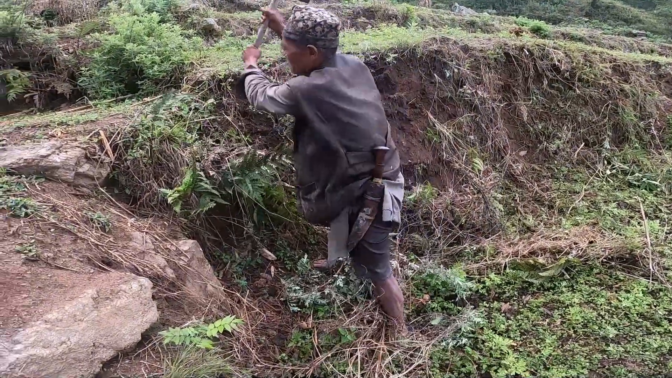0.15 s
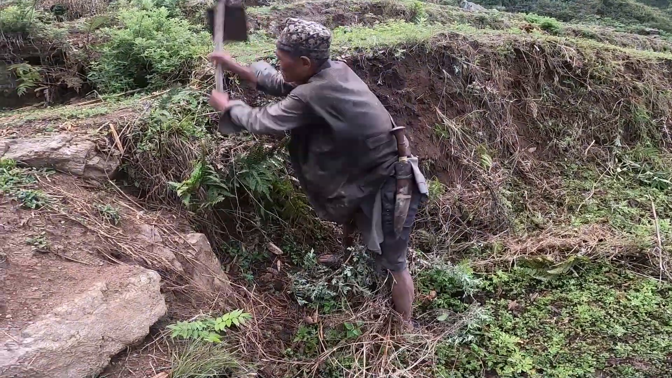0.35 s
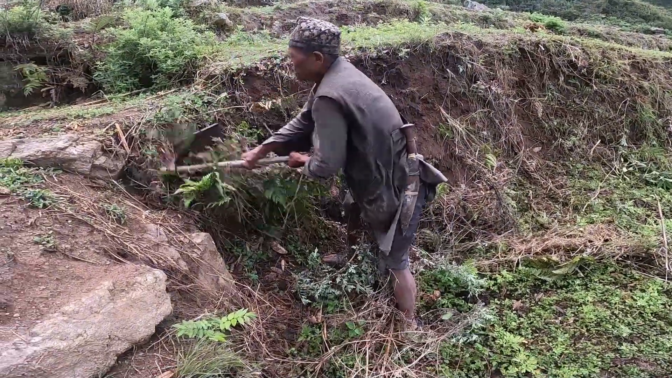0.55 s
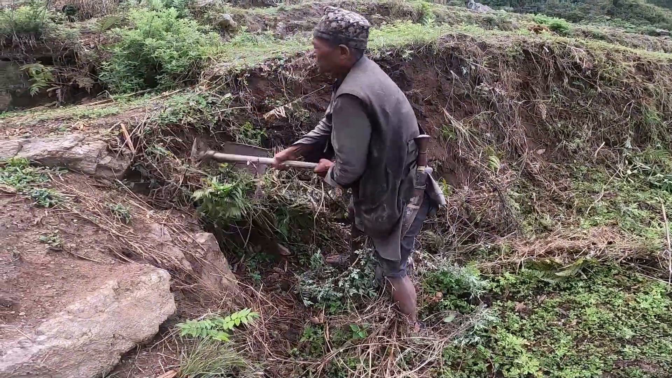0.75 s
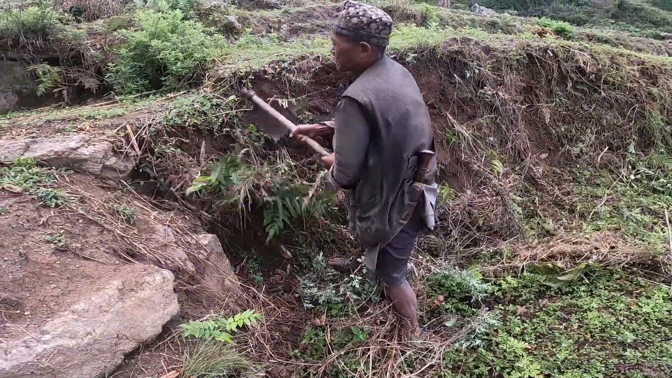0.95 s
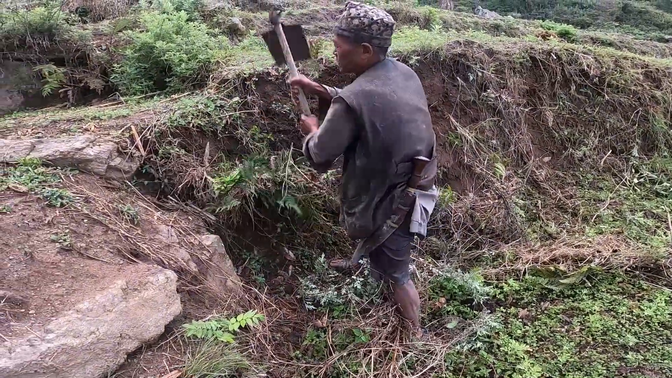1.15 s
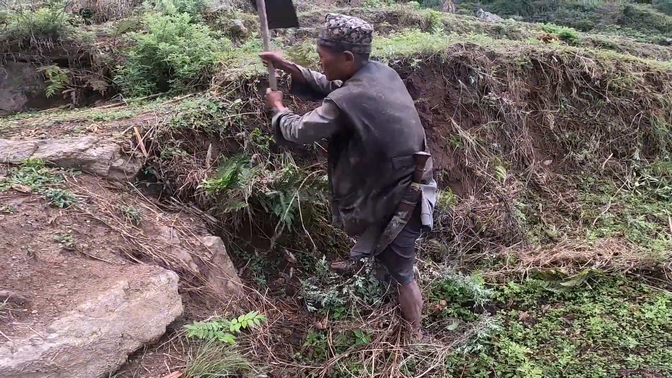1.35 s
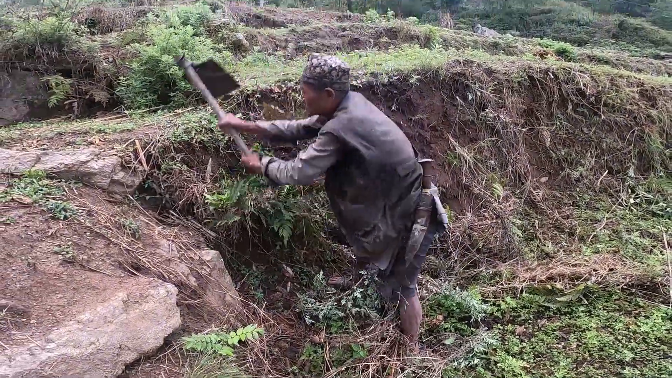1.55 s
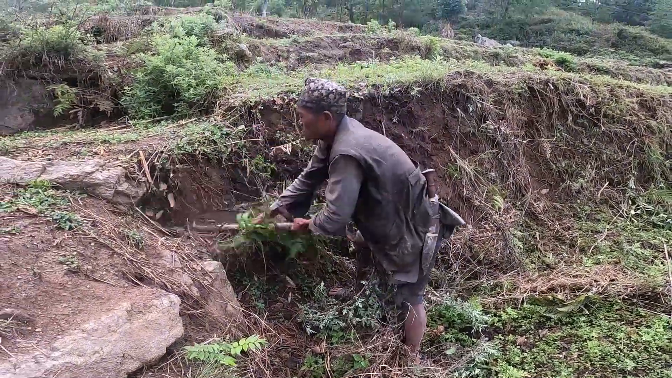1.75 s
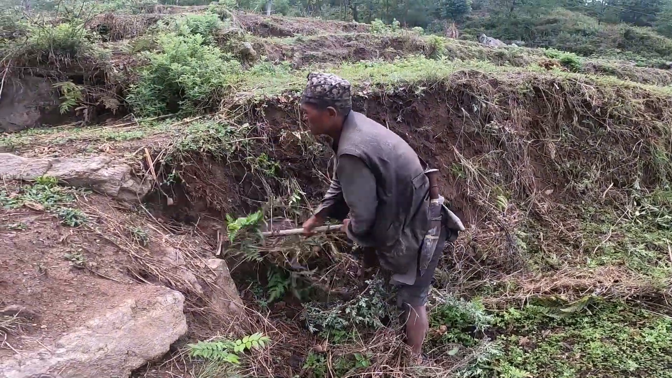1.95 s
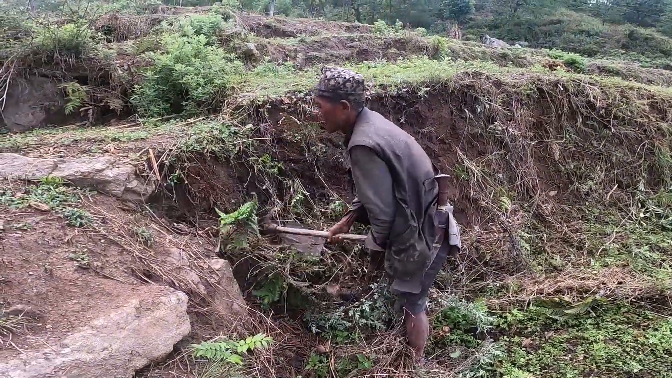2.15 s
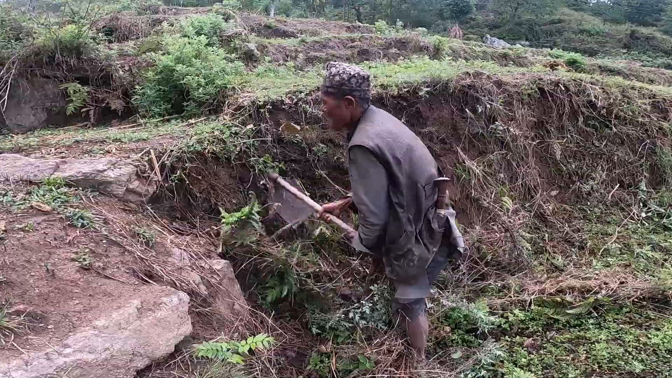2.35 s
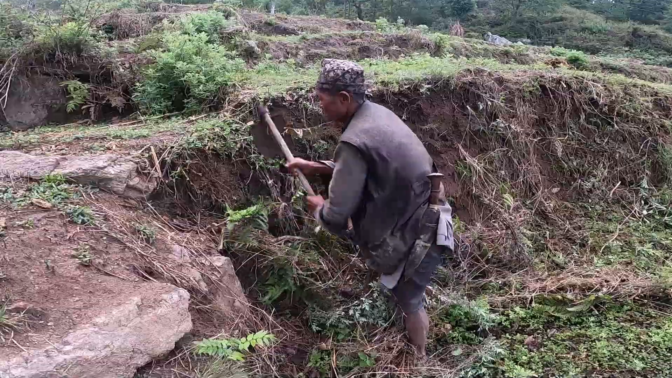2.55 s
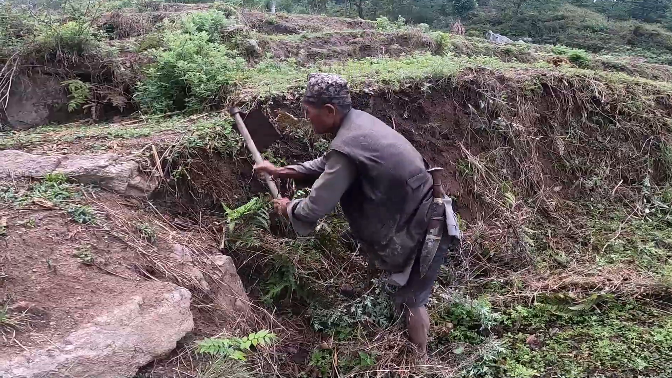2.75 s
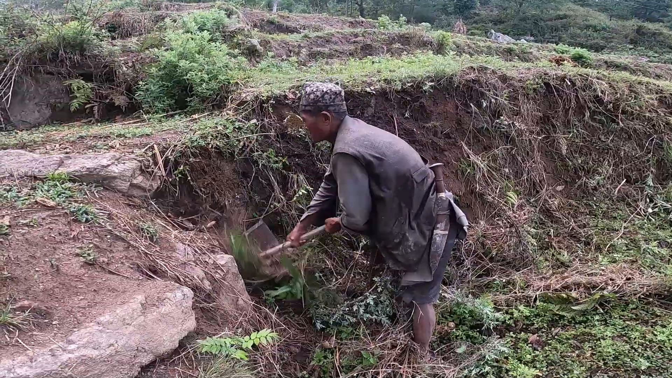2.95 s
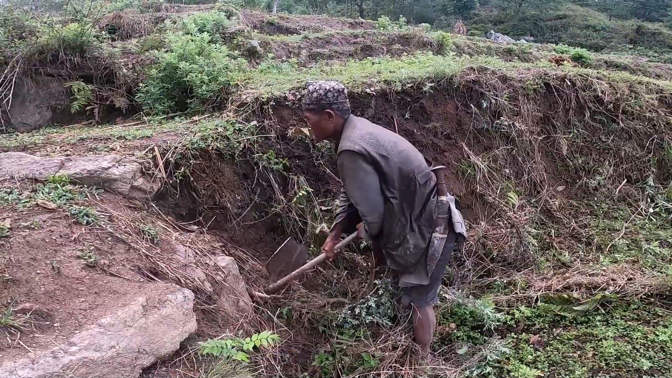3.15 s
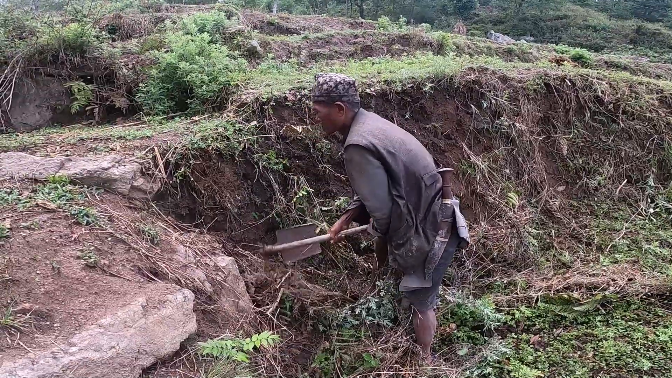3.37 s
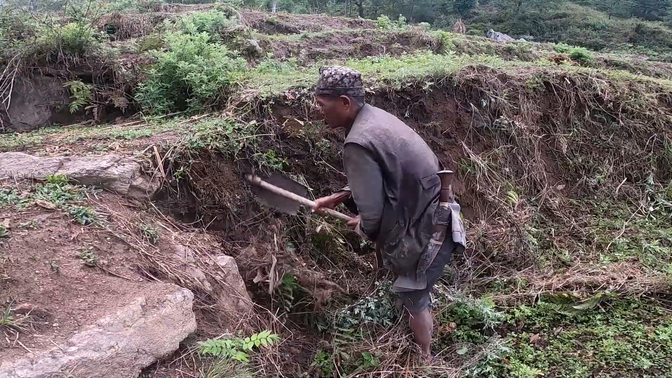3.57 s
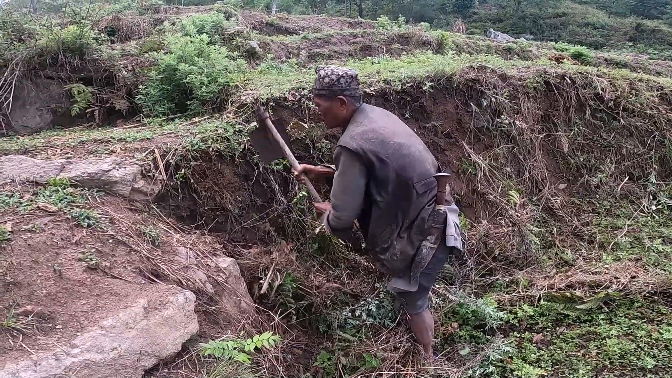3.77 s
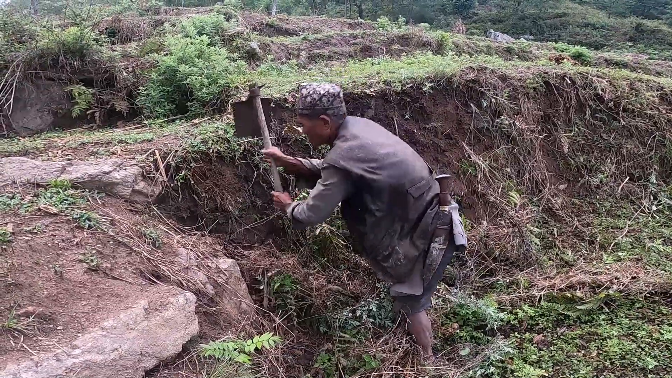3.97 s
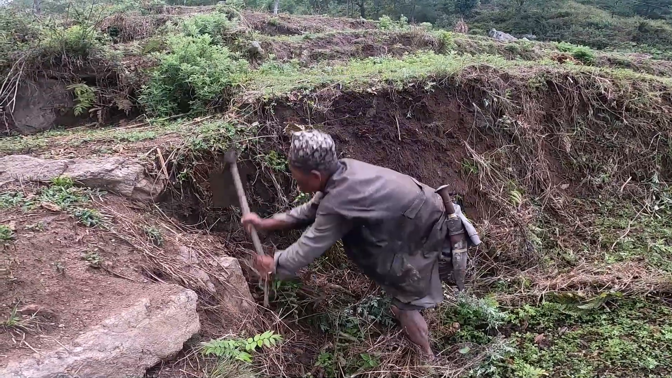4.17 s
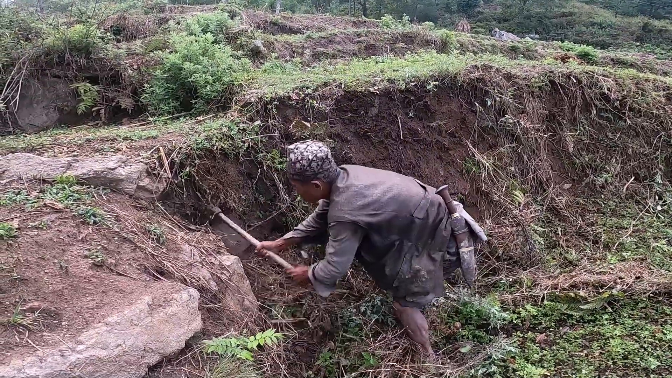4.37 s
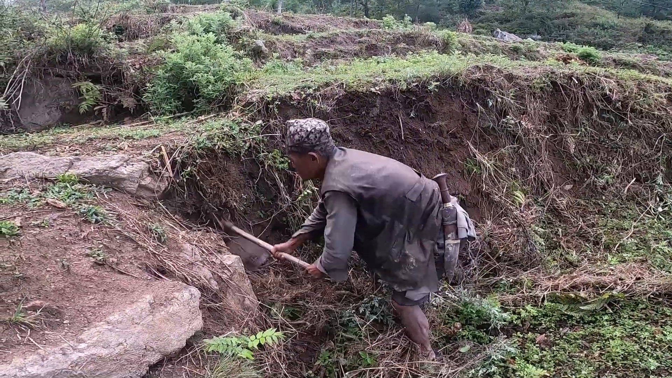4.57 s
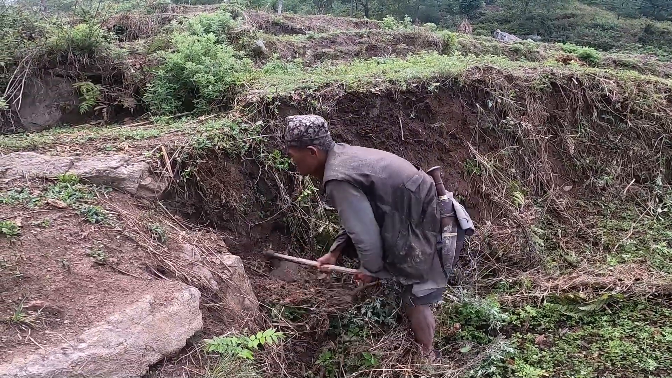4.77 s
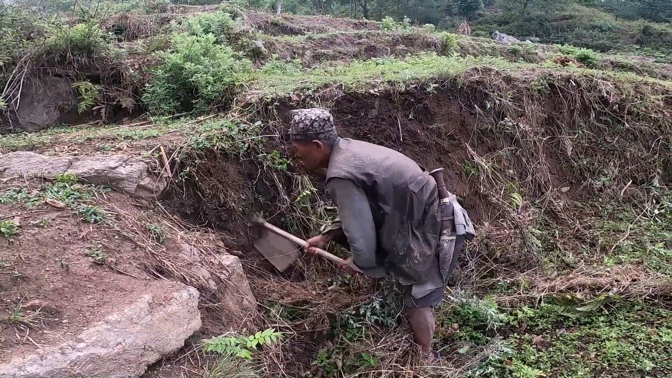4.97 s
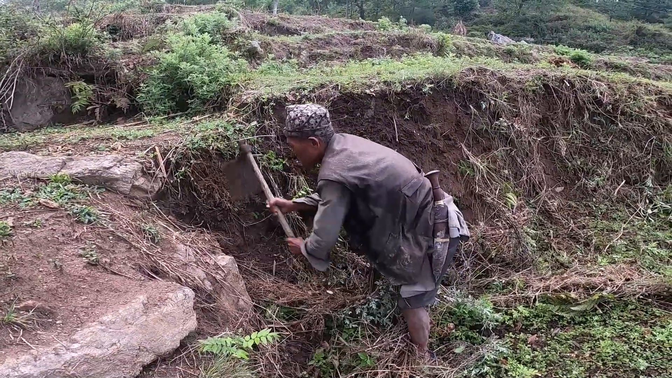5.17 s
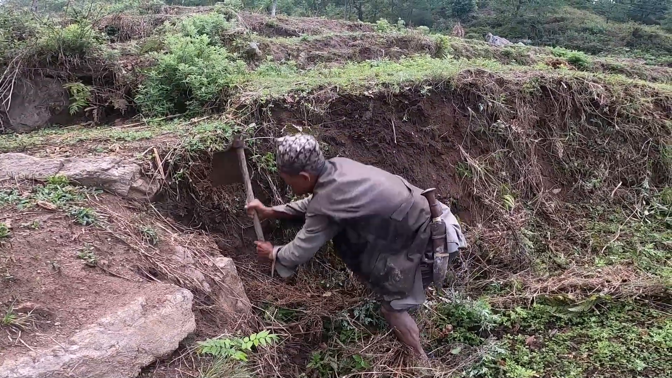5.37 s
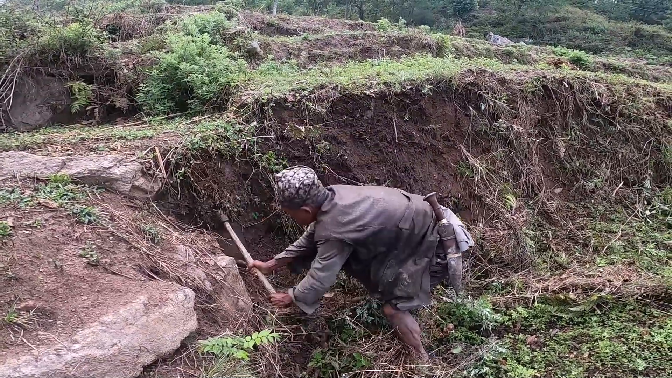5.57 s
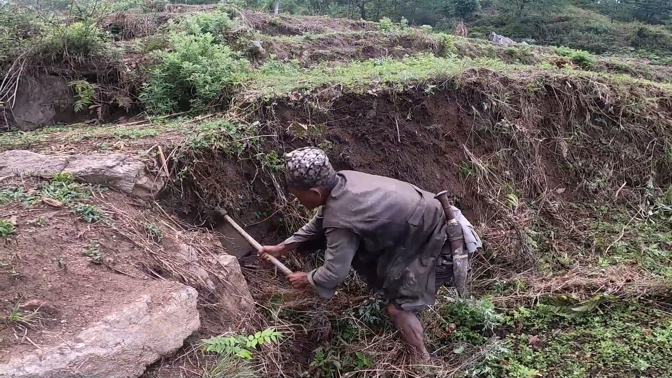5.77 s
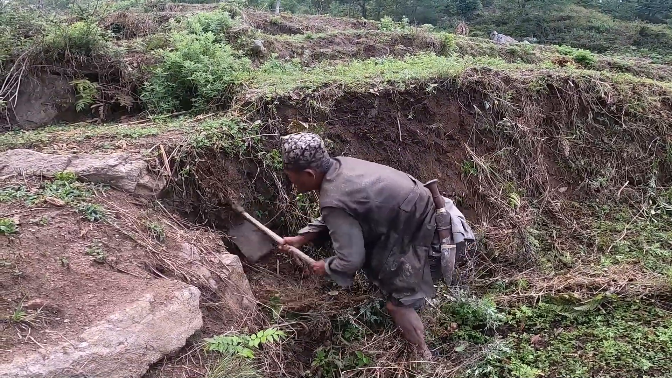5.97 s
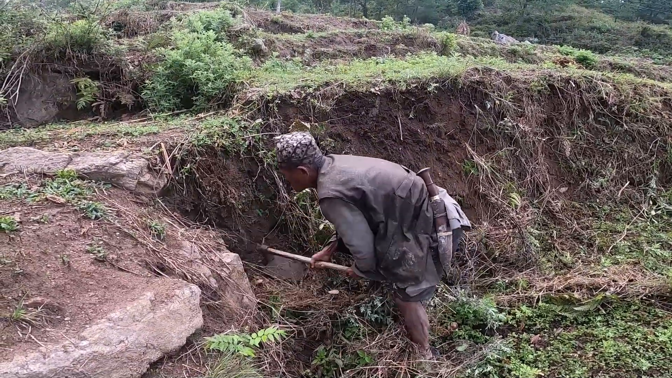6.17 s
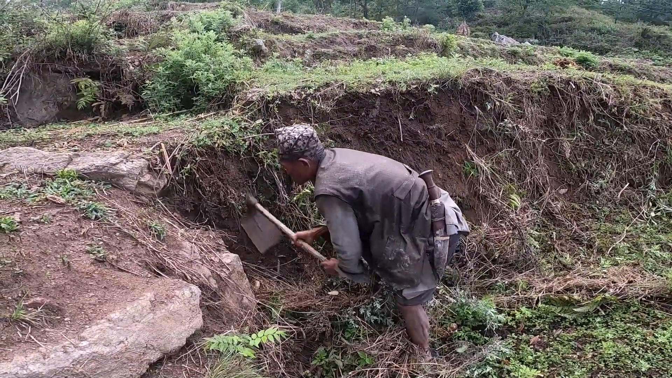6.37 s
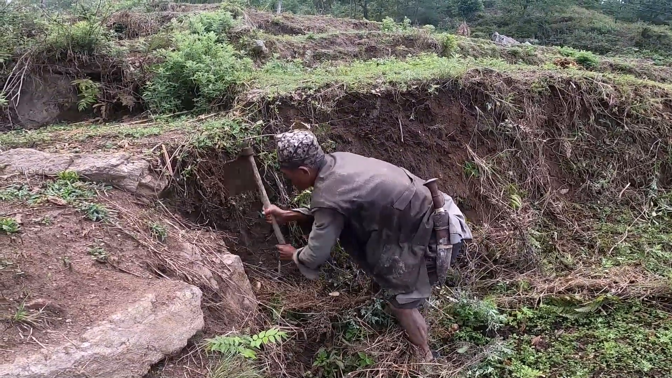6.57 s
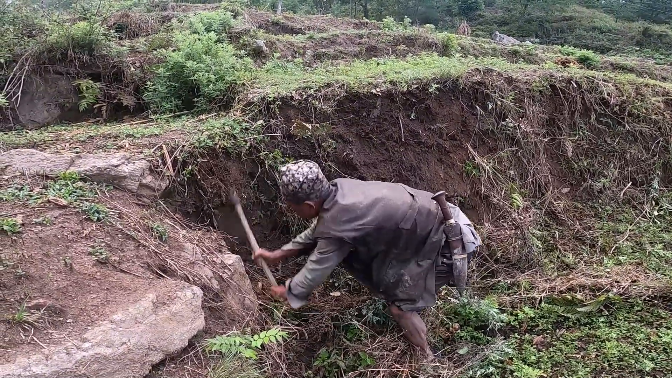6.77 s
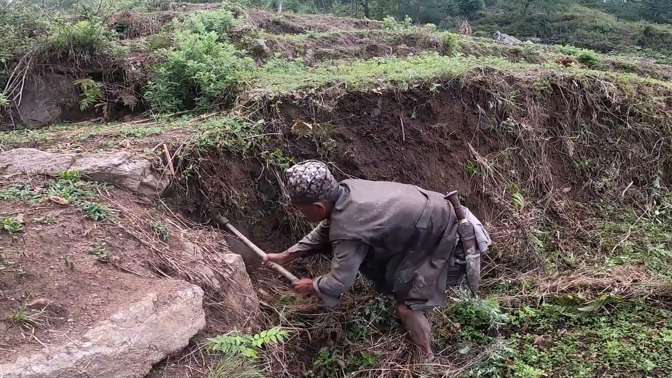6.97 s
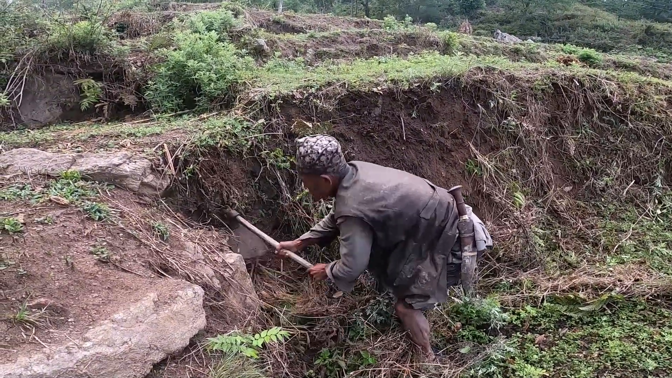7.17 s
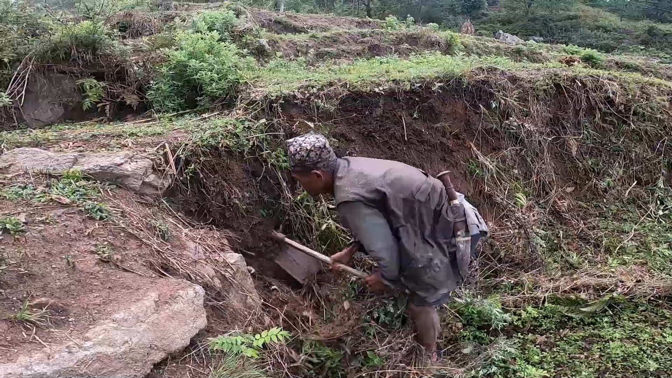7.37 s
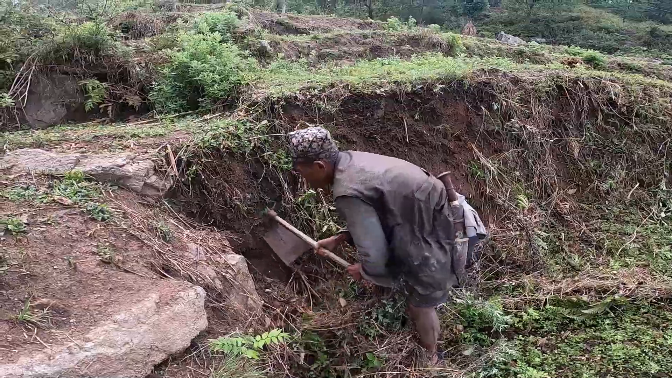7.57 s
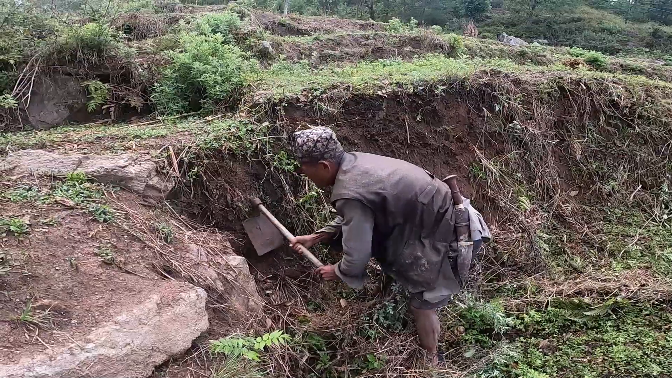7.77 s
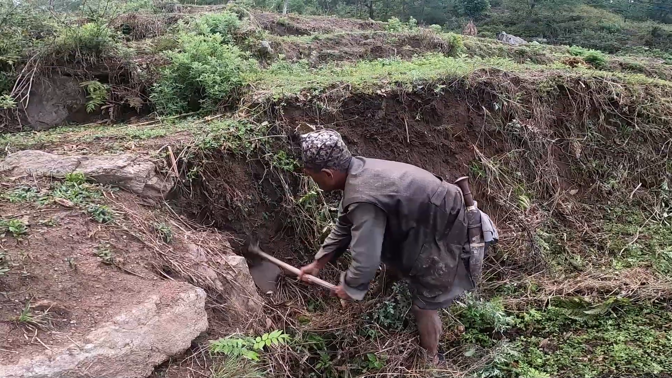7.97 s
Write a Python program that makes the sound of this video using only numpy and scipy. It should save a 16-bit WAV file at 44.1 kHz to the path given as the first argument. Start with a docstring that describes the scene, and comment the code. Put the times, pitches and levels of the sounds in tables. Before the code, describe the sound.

Loose soil trickles through dry grass, then a hand hoe chops into an earth bank close by, a little more than once a second. The strokes thud and tear through roots, and the steel blade sometimes scrapes grit or clinks on a stone. Clods drop and more soil spills down with a hiss and a patter. Faint birds whistle far off over the soft hush of an open hillside.

```python
"""Loose soil trickles through dry grass and a far bird whistles; then a hand hoe chops into an earth bank.
With each stroke the steel blade tears through roots; often it thumps the ground or clinks on a stone.
Clods drop, grit scrapes over the steel, and more soil spills down with a hiss and a patter.
Birds keep calling across the open hillside, over a soft hush of air."""
import sys
import numpy as np
from scipy import signal
from scipy.fft import rfft, irfft, next_fast_len
from scipy.io import wavfile

SR = 44100
rng = np.random.default_rng(int(sys.argv[2]) if len(sys.argv) > 2 else 0)


def wav_record(signal):
    """Record a signal, one row per channel, as 16-bit PCM in the file named by sys.argv[1]."""
    frames = np.transpose(np.atleast_2d(signal))
    bounded = np.clip(frames, -1, 1)
    # unit amplitude maps onto the largest positive 16-bit level
    quanta = np.round(bounded * 32767).astype(np.int16)
    wavfile.write(sys.argv[1], SR, quanta)


N = 353814
TIME = np.arange(N) / SR
AGE = TIME[:SR // 3]  # seconds since one short sound began

# how wide the sound is, side compared with middle: f/Hz, level/dB
STEREO_WIDTH = [(100, -19), (500, -15), (1200, -16), (2200, -10.5), (4500, -8.5), (8000, -7),
                (12500, -11.5)]
# how far the sound leans, left compared with right: f/Hz, level/dB
STEREO_LEAN = [(100, -0.7), (1200, 0), (2200, 2), (4500, 1.5), (8000, -2), (12500, -4)]
# tone of the air, rustling grass, soft crumbs, rumbling earth and tearing roots: f/Hz, relative level/dB
AIR_TONE = [(15, -47), (25, -2), (97, -13.5), (166, 4.5), (607, -4.5), (1070, 0), (1610, -1), (3340, -10.5),
            (4250, 4.5), (6920, -36.5), (8830, -25), (12200, -66), (16000, -50)]
RUSTLE_TONE = [(200, -28), (700, -10), (1300, 0.5), (2000, 1.5), (3200, 3), (4400, 2), (5600, -3),
               (8600, -5), (10300, -11.5), (12500, -13.5), (16000, -32.5)]
CRUMB_TONE = [(25, -23), (90, -17.5), (170, 7), (280, 5.5), (420, -2), (700, 2.5), (1200, 3), (2500, -19.5)]
EARTH_TONE = [(20, -27), (50, 5), (130, -3), (260, 1), (420, -13), (900, -26), (3000, -57)]
TEARING_TONE = [(60, -1), (200, 3), (420, 0), (700, 3), (1400, 2.5), (3000, 2), (5000, -3), (8500, -8.5),
                (10500, -16), (13000, -19), (16000, -39)]
# a bird's runs of three pips: t/s, relative level/dB
PIP_RUNS = [(2.763, -55), (3.448, -49), (4.151, -50), (4.828, -47), (5.507, -47), (6.214, -47),
            (6.91, -46.5), (7.629, -46.5)]
# pitches the first pip slides through: f/Hz
PIP_GLIDE = [1300, 1203, 990, 880]
# another bird's two-note calls: t/s, relative level/dB
WHISTLE_CALLS = [(0.021, -54), (0.899, -54), (3.96, -52.5), (4.97, -55), (7.581, -55.5)]
# spills of soil: start t/s, build-up/s, fade/(dB per s), rustle level/dB, crumb level/dB
SPILLS = [(-.2, 0.033, 23.5, -46, -60.5), (.58, .18, 23.5, -38, -54.5), (1.8, 0.069, 30.5, -38.5, -51),
          (3.02, 0.13, 84, -37.5, -52), (3.33, 0.21, 18.5, -47, -57.5), (4.271, 0.05, 23, -46, -54.5),
          (4.65, 0.12, 63, -40, -51.5), (5.52, 0.1, 24, -54.5, -70), (5.9, 0.28, 89, -46.5, -56),
          (6.83, 0.28, 25, -52, -58), (7.25, 0.15, 60, -38.5, -53)]
# dull, crumbly thumps of earth, as the hoe strikes or loose soil lands: t/s, level/dB, rise/s, fall/s
EARTH_THUMPS = [(1.772, -33, 0.0022, 0.0089), (1.839, -24.5, 0.005, 0.018), (2.403, -50, 0.006, 0.011),
                (3.053, -35, .005, 0.043), (3.573, -46.5, 0.0056, 0.098), (4.599, -46.5, 0.015, 0.016),
                (4.839, -47, 0.015, 0.015), (5.646, -28.5, 0.0037, 0.0096), (6.007, -40.5, 0.0064, 0.035),
                (6.955, -40, 0.0066, 0.0085), (7.288, -37, 0.0061, 0.037)]
# clods and pebbles landing, twigs snapping: t/s, relative level/dB, centre f/Hz
CLODS = [(0.435, -37.5, 3900), (0.647, -22, 1200), (.839, -23, 2400), (1.078, -29.5, 1160),
         (2.086, -23, 6100), (2.544, -39, 1490), (3.014, -23.5, 4500), (4.186, -33, 1530),
         (4.536, -33, 3000), (4.566, -24, 2600), (4.836, -23, 1060), (5.884, -31, 3120),
         (5.955, -29.5, 1400), (5.977, -32, 3500), (6.005, -24, 1300), (6.02, -29, 4480),
         (6.039, -46, 3220), (6.302, -35, 9000), (6.621, -43.5, 4000), (7.105, -35, 3970),
         (7.172, -30, 1800), (7.254, -27, 1300), (7.281, -24, 2200), (7.324, -22, 1300)]
# ringing tones of the steel blade, its twisting one first: f/Hz, relative level/dB, time to fade 60 dB/s
BLADE_TONES = [(1070, -6, 0.91), (1510, -3, 0.69), (1668, -21.5, 0.46), (1896, -11, 0.15),
               (2080, -27, 0.19), (2820, -12, 0.97), (3140, -47, 0.28), (3125, -11.5, 0.4),
               (3200, -13.5, 0.36), (4460, -9.5, 0.24), (7380, -18, 0.058), (8680, -16.5, .1)]
# short-lived tones of the wooden handle and its socket: f/Hz, relative level/dB, time to fade 60 dB/s
HANDLE_TONES = [(243, -3, 0.088), (595, 1.5, 0.042), (741, -2.5, 0.059), (1050, -14.5, 0.06),
                (1257, -1, 0.064), (1646, -4, 0.084), (1910, -4, 0.025), (2076, -15, 0.054),
                (2600, -7, 0.066), (3295, -7.5, 0.059), (4050, -17, 0.034), (4480, -20, 0.057),
                (6900, -22, 0.044)]
# grit dragging over the blade: peak t/s, level/dB, rise/s, fall/s
SCRAPES = [(0.599, -35, .01, .04), (1.807, -31.5, 0.0065, 0.017), (4.595, -40.5, 0.016, 0.052),
           (4.85, -45, 0.056, 0.11), (5.604, -46.5, 0.0074, 0.036), (6.028, -39, 0.021, 0.029),
           (6.876, -49.5, 0.022, 0.063), (7.308, -47, 0.033, .08)]
# blows on stones and hard earth (a corner blow twists the blade), with relative levels:
# t/s, centre f/Hz, crack/dB, clack/dB, ring/dB, extra twist/dB, longest ring the soil's grip allows/s
KNOCKS = [(1.7706, 1720, -23.5, -20, -21, -10, 0.45), (1.830, 960, -20, -17, -31, 0, 0.18),
          (1.943, 700, -42, -24, -23.5, -7.5, 0.59), (2.3931, 1600, -23.5, -31.5, -50, 7, 10),
          (3.048, 780, -21, -20, -23.5, 3, 0.15), (4.3634, 1370, -18.5, -26, -42, 2, 0.22),
          (5.593, 2400, -34.5, -40, -58, 3, 0.56), (5.644, 616, -20, -23.5, -36, 2, 0.076),
          (6.0525, 1300, -26.5, -21, -19, -9, 0.97), (6.2395, 3200, -23.5, -15, -26, -4.5, 1.2),
          (6.858, 2190, -47, -38, -63, -9, .51), (7.206, 1700, -28.5, -31, -39.5, -8, 0.44),
          (7.255, 750, -34, -30.5, -56, -6, 1.1), (7.283, 820, -40.5, -29.5, -34, -16, .74)]
# dull thuds on the ground, hoe blows and probably one footstep:
# t/s, level/dB, starting f/Hz, final f/Hz, fade/s
THUDS = [(0.579, -25, 85, 40, 0.044), (1.8461, -14, 232, 184, .007), (3.051, -30, 340, 50, 0.018),
         (4.374, -25, 126, 48.2, .033), (4.595, -55, 100, 45, 0.04), (5.643, -24, 235, 42, 0.031),
         (6.055, -28.5, 148, 39.3, 0.026), (6.955, -29, 163, 35.7, 0.029), (7.067, -33.5, 252, 177, 0.011),
         (7.259, -43, 161, 60.3, 0.055)]
# the blade cutting soil and roots: full-depth t/s, level/dB, rise/s, hold/s, fall/s, tilt/(dB per octave)
CUTS = [(0.57, -25, 0.0052, 0.025, 0.028, 0), (1.803, -27, 0.016, 0.039, 0.016, 2),
        (3.031, -27.5, 0.0098, 0.01, 0.092, 3), (3.557, -35.5, 0.0018, 0.0029, 0.042, 0),
        (4.363, -28.5, .014, 0.025, 0.035, 0.76), (5.647, -29.5, 0.0088, 0.0082, 0.012, 0.5),
        (6.054, -22.5, 0.0016, 0.0032, 0.0045, 0.5), (6.94, -34.5, 0.013, .009, 0.017, 0.5)]


def from_db(db):
    """Turn decibels into a number to multiply by."""
    return 10 ** (np.asarray(db) / 20)


def unit_power(x):
    """Scale a signal so that its average power is 1."""
    return x / np.sqrt(np.mean(x ** 2) + 1e-20)


def at_hz(points, hz):
    """Read a table's level at any frequency, with octaves evenly spaced."""
    table_hz, table_db = np.transpose(points)
    return np.interp(np.log(hz), np.log(table_hz), table_db)


def hump(hz, centre_hz, slope_db):
    """A hill in dB: flat on top, falling by slope_db an octave far from the centre."""
    return -slope_db * (np.hypot(1, np.log2(hz / centre_hz)) - 1)


def add(out, s, sound):
    """Mix a sound in, starting at s seconds."""
    start = max(round(s * SR), 0)
    part = sound[..., :max(N - start, 0)]
    out[:, start:start + part.shape[-1]] += part


def add_swell(out, sound, s, rise, fall, hold=0):
    """Mix in a sound that grows to its peak at s seconds, holds and dies away."""
    lead = AGE[-1] / 4
    growing = (AGE - lead) / rise
    dying = (lead + hold - AGE) / fall
    add(out, s - lead, sound * np.exp(np.minimum(0, np.minimum(growing, dying))))


def drift(size, per_s):
    """A random wander of about 1 either way, turning per_s times a second."""
    turns = rng.standard_normal(int(size / SR * per_s) + 3)
    return unit_power(np.interp(np.arange(size) / SR * per_s, np.arange(len(turns)), turns))


def grains(size, per_s, spread_db):
    """Tiny random hits of uneven strength, each from its own direction: (middle, side)."""
    hits = rng.random(size) < per_s / SR
    strength = from_db(spread_db * np.minimum(rng.exponential(1, size), 5))
    return hits * strength * rng.standard_normal((2, size))


def colour(pair, tone, wider_db=0):
    """Give a (middle, side) pair the tone(hz) in dB; returns left and right at power 1."""
    size = pair.shape[1]
    padded = next_fast_len(size)
    hz = np.maximum(np.arange(padded // 2 + 1) * SR / padded, 1)
    middle, side = rfft(pair, padded) * from_db(tone(hz))
    signs = np.array([[1], [-1]])
    ears = middle + signs * side * from_db(at_hz(STEREO_WIDTH, hz) + wider_db)
    ears *= from_db(signs * at_hz(STEREO_LEAN, hz) / 2)
    return unit_power(irfft(ears, padded)[:, :size])


def ring(hz, db, fade_s):
    """A struck object rings with several tones, each losing 60 dB in its fade_s."""
    age = TIME[:int(SR * np.max(fade_s)), None]
    height = from_db(db) * rng.choice([-1, 1], len(hz))
    fading = np.exp(-np.log(1000) * age / fade_s)
    return np.sum(height * fading * np.sin(2 * np.pi * hz * age), axis=1)


def thin_bass(sound, pitch_hz):
    """A small source moves little air far below its own pitch."""
    return signal.sosfilt(signal.butter(2, pitch_hz / 3, "high", fs=SR, output="sos"), sound)


def hillside(sound, fade_s, echo_db):
    """Banks and bushes scatter back dull echoes, which lose 60 dB in fade_s."""
    age = TIME[:SR]
    bounces = grains(SR, per_s=3000, spread_db=2.0)
    echoes = colour(bounces, lambda hz: -10 * np.log10(1 + (hz / 6000) ** 2), wider_db=13.5)
    echoes *= np.exp(-np.log(1000) * age / fade_s) * (age > .006)
    echoes = unit_power(echoes) / np.sqrt(SR)
    return sound + from_db(echo_db) * signal.fftconvolve(sound, echoes, axes=1)[:, :N]


def air(level_db=-62):
    """The steady, wide hush of the open air."""
    noise = rng.standard_normal((2, N))
    return from_db(level_db) * colour(noise, lambda hz: at_hz(AIR_TONE, hz), wider_db=11.5)


def bird_note(length_s, glide_hz):
    """A slightly fluttering whistle slides through the given pitches, swelling and fading."""
    progress = np.linspace(0, 1, max(int(length_s * SR), 2))
    pitch = np.interp(progress, np.linspace(0, 1, len(glide_hz)), glide_hz)
    pitch *= 1 + 0.012 * drift(len(pitch), per_s=170)
    return np.sin(2 * np.pi * np.cumsum(pitch) / SR) * np.sqrt(np.abs(np.sin(np.pi * progress)))


def birds(pip_step_s=0.063, pip_fade_db=2, pip_sink=0.042, waver_db=4.5):
    """Far birds: runs of pips that sink and soften, two-note whistles and one small trill."""
    out = np.zeros((2, N))
    for s, db in PIP_RUNS:
        for k in range(3):
            pip = bird_note(0.0378, np.array(PIP_GLIDE) * (1 - pip_sink * k))
            pip *= np.linspace(1.25, .4, len(pip))
            add(out, s + k * pip_step_s, from_db(db - k * pip_fade_db) * pip)
    for s, db in WHISTLE_CALLS:  # a long arched note, then a shorter falling one
        add(out, s, from_db(db) * bird_note(.18, [1600, 1820, 1886, 1880, 1860, 1660]))
        add(out, s + 0.19, from_db(db - 3.5) * bird_note(0.12, [1631, 1680, 1600, 1457]))
    for s in np.linspace(6.345, 7.0, num=11):  # the trill
        add(out, s, from_db(-60) * bird_note(0.033, [2900, 3020, 3130]))
    return out * from_db(waver_db * drift(N, per_s=48))


def soil_flow(rounding_db=3):
    """Each spill builds up, rounds off and runs out; returns the strength of rustle and of tumbling."""
    rustle_power, tumble_power = from_db(-67) ** 2, from_db(-71) ** 2  # the bank never stops crumbling
    for s, build_s, fade_db_per_s, rustle_db, crumbs_db in SPILLS:
        building = np.clip((TIME - s) / build_s, 0, 1)
        past_peak = np.maximum(TIME - s - build_s, 0)
        flow = building * from_db(rounding_db - np.hypot(rounding_db, fade_db_per_s * past_peak))
        rustle_power += (flow * from_db(rustle_db)) ** 2
        tumble_power += (flow * from_db(crumbs_db)) ** 2
    return np.sqrt(rustle_power), np.sqrt(tumble_power)


def crumbling(lumps_per_s=16, burst_s=0.0055):
    """Small lumps of three sizes break up, each in a brief spray of grit."""
    out = np.zeros((2, N))
    for centre_hz in np.geomspace(1400, 6000, num=3):
        breaks = (rng.random(N) < lumps_per_s / SR) * rng.uniform(0.27, 1, N)
        spray = unit_power(signal.lfilter([1], [1, -np.exp(-1 / (burst_s * SR))], breaks + 1e-18))
        noise = rng.standard_normal((2, N))
        out += spray * colour(noise, lambda hz: at_hz(RUSTLE_TONE, hz) + hump(hz, centre_hz, 11))
    return unit_power(out)


def pebbles():
    """Each size of pebble taps briefly at its own pitch."""
    out = np.zeros((2, N))
    for pitch_hz in np.geomspace(650, 3400, num=7):
        taps = grains(N, per_s=18, spread_db=3.4)[0]
        out += signal.lfilter(*signal.iirpeak(pitch_hz, Q=5, fs=SR), taps + 1e-18) / np.sqrt(pitch_hz)
    return unit_power(out)


def sliding_soil():
    """Fine soil hisses through grass, grit ticks on stalks, crumbs tumble in clumps among pebbles."""
    rustle, tumbling = soil_flow()
    sand = colour(grains(N, per_s=9000, spread_db=-1), lambda hz: at_hz(RUSTLE_TONE, hz), wider_db=1.5)
    sand *= from_db(-0.84 + 0.83 * drift(N, per_s=61))
    ticks = grains(N, per_s=130, spread_db=1)
    grit = colour(ticks, lambda hz: at_hz(RUSTLE_TONE, hz) + 0.73 * np.log2(hz))
    crumbs = colour(grains(N, per_s=3300, spread_db=1.5), lambda hz: at_hz(CRUMB_TONE, hz), wider_db=9.5)
    crumbs *= from_db(-2 + 2 * drift(N, per_s=56))
    coarse = crumbs + from_db(-4) * pebbles()
    fine = sand + from_db(-9) * grit + from_db(-8) * crumbling()
    return rustle * fine + tumbling * coarse


def earth_thumps():
    """Many soft crumbs make one dull thump, as the hoe strikes or loose soil lands."""
    out = np.zeros((2, N))
    for s, db, rise, fall in EARTH_THUMPS:
        hits = grains(len(AGE), per_s=3700, spread_db=0.5)
        crumbs = colour(hits, lambda hz: at_hz(CRUMB_TONE, hz) + hump(hz, 270, slope_db=6.5))
        add_swell(out, from_db(db) * crumbs, s, rise, fall)
    return out


def clods(gain_db=-7, fade_s=0.0061):
    """Each lump bursts in a few milliseconds; small hard bits sound higher."""
    out, age = np.zeros((2, N)), TIME[:SR // 10]
    for s, db, centre_hz in CLODS:
        bits = grains(len(age), per_s=16000, spread_db=3.0)
        burst = colour(bits, lambda hz: hump(hz, centre_hz, slope_db=4) + 0.64 * at_hz(TEARING_TONE, hz))
        add(out, s, from_db(db + gain_db) * np.exp(-age / fade_s) * burst)
    return out


def scrapes(width_hz=45, treble_db=2, rasp_db=-5):
    """Grit rasps along the steel and wakes its tones, blurred by the soil lying on it."""
    out = np.zeros((2, N))
    for s, db, rise, fall in SCRAPES:
        grit = grains(len(AGE), per_s=3800, spread_db=3.5)
        steel = np.zeros(len(AGE))
        for tone_hz, tone_db, _ in BLADE_TONES:
            ringing = signal.lfilter(*signal.iirpeak(tone_hz, tone_hz / width_hz, fs=SR), grit[0])
            steel += from_db(tone_db + treble_db * np.log2(tone_hz / 1500)) * ringing
        rasp = from_db(rasp_db) * colour(grit, lambda hz: at_hz(RUSTLE_TONE, hz))
        add_swell(out, from_db(db) * (unit_power(steel) + rasp), s, rise, fall)
    return out


def knocks(crack_s=0.0047, bounce_s=.0028):
    """Grit cracks under the edge, the handle clacks twice, and the blade rings unless soil grips it."""
    out = np.zeros((2, N))
    wood_hz, wood_db, wood_fade_s = np.transpose(HANDLE_TONES)
    steel_hz, steel_db, steel_fade_s = np.transpose(BLADE_TONES)
    twisting = np.arange(len(BLADE_TONES)) == 0
    for s, hit_hz, crack_db, clack_db, ring_db, twist_db, grip_s in KNOCKS:
        noise = rng.standard_normal((2, len(AGE)))
        crack = colour(noise, lambda hz: hump(hz, hit_hz, slope_db=10) + .6 * at_hz(TEARING_TONE, hz))
        add(out, s, thin_bass(from_db(crack_db) * np.exp(-AGE / crack_s) * crack, hit_hz))
        wood_share_db = wood_db + hump(wood_hz, hit_hz, slope_db=16.5)
        for delay, db in ((0, -2), (bounce_s, -4)):
            clack = ring(wood_hz, clack_db + db + wood_share_db, wood_fade_s)
            add(out, s + delay, thin_bass(clack, hit_hz))
        steel_share_db = steel_db + twist_db * twisting + hump(steel_hz, hit_hz, slope_db=6)
        clang = ring(steel_hz, ring_db + steel_share_db, fade_s=1 / (1 / steel_fade_s + 1 / grip_s))
        add(out, s, thin_bass(clang, hit_hz) * from_db([[.6], [-.6]]))  # a little to the left
    return out


def thuds(sink_s=.013, rumble_db=-6):
    """The ground gives way: a short swing that sinks in pitch as more earth moves, with a dull rumble."""
    out = np.zeros((2, N))
    for s, db, start_hz, end_hz, fade_s in THUDS:
        pitch = end_hz + (start_hz - end_hz) * np.exp(-AGE / sink_s)
        swing = np.sin(2 * np.pi * np.cumsum(pitch) / SR)
        noise = rng.standard_normal((2, len(AGE)))
        rumble = colour(noise, lambda hz: at_hz(EARTH_TONE, hz) + hump(hz, end_hz, slope_db=8.5))
        # rubbing in the soil ends the swing sooner than a plain fade would
        strength = (1 - np.exp(-AGE / 0.0011)) * np.exp(-(AGE / fade_s) ** np.sqrt(2))
        add(out, s, thin_bass(from_db(db) * strength * (swing + from_db(rumble_db) * rumble), end_hz))
    return out


def cuts():
    """Roots and grit tear ever louder as the blade sinks in, give way steadily, then fall quiet."""
    out = np.zeros((2, N))
    for s, db, rise, hold, fall, tilt_db in CUTS:
        snaps = grains(len(AGE), per_s=9000, spread_db=-0.5)
        tearing = colour(snaps, lambda hz: at_hz(TEARING_TONE, hz) + tilt_db * np.log2(hz / 2000))
        add_swell(out, from_db(db) * tearing, s, rise, fall, hold)
    return out


def scene():
    """Quiet air, birds across the slope, and sliding soil and digging close by."""
    background = air() + hillside(birds(), fade_s=0.58, echo_db=-7.5)
    digging = earth_thumps() + clods() + scrapes() + knocks() + thuds() + cuts()
    return background + sliding_soil() + hillside(digging, fade_s=0.22, echo_db=-24.5)


def record(dry, cutoff_hz=16300):
    """Sound reaches the left side half a sample late; the highest treble is cut steeply."""
    lag = np.exp(-1j * np.pi * np.arange(N // 2 + 1) / N)
    left = irfft(rfft(dry[0]) * lag, N)
    treble_cut = signal.cheby2(16, 70, cutoff_hz, fs=SR, output="sos")
    return signal.sosfilt(treble_cut, np.array([left, dry[1]]))


dry = scene()
out = record(dry)
wav_record(out)
```